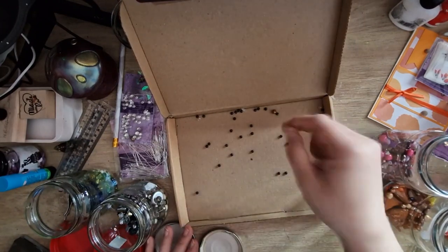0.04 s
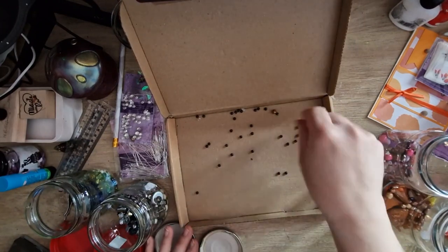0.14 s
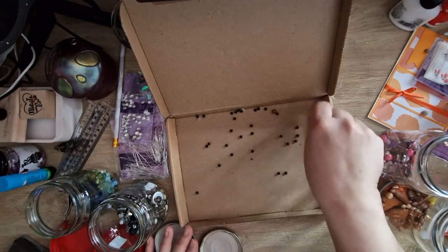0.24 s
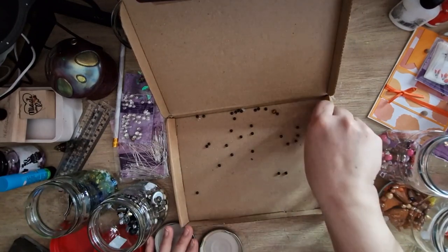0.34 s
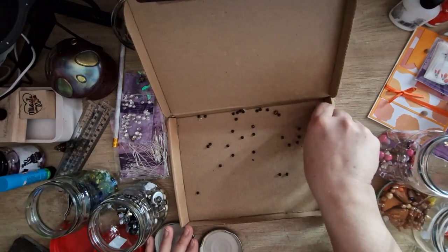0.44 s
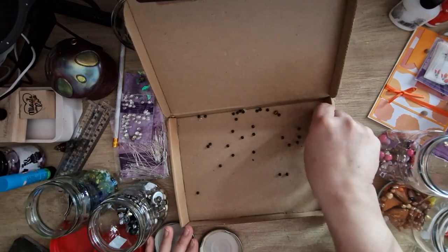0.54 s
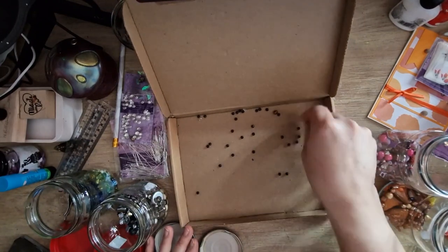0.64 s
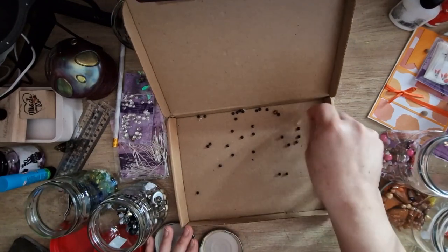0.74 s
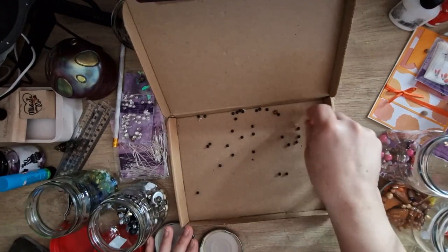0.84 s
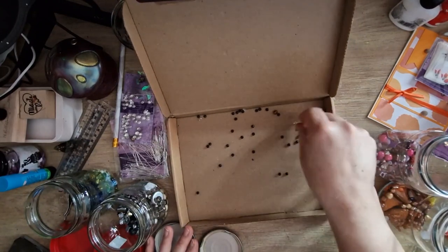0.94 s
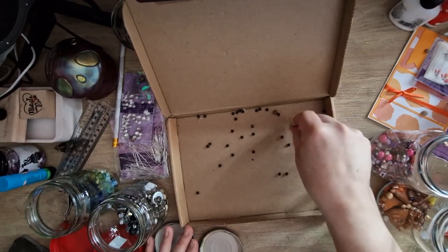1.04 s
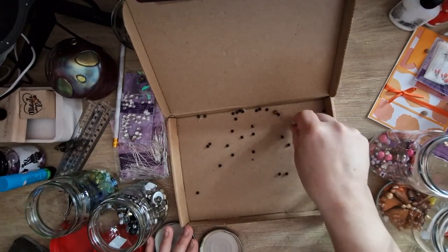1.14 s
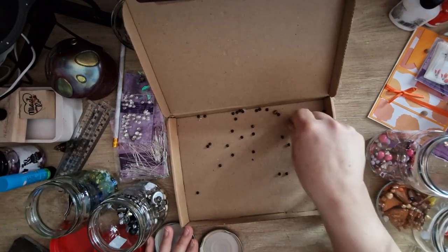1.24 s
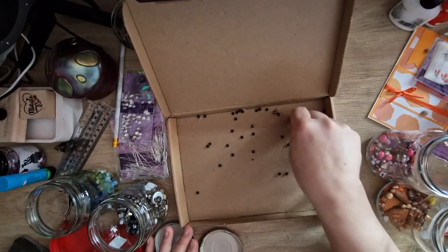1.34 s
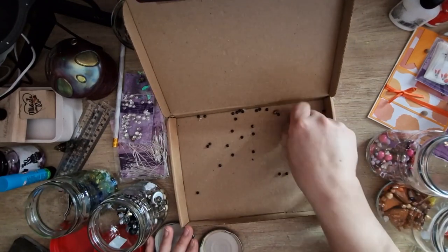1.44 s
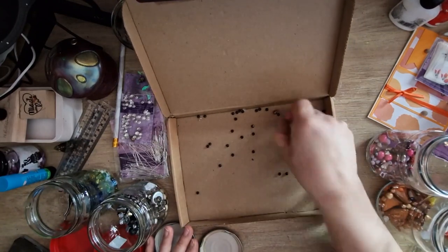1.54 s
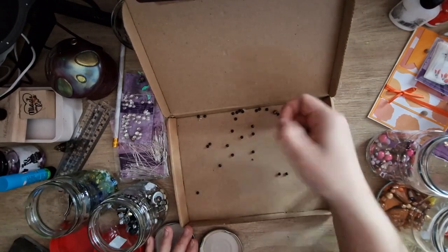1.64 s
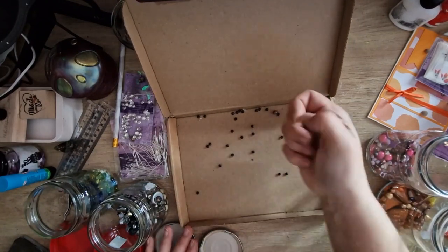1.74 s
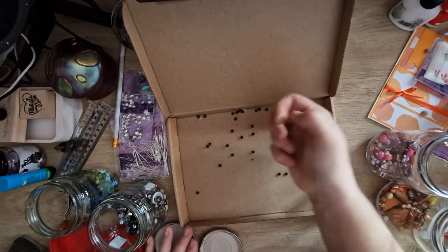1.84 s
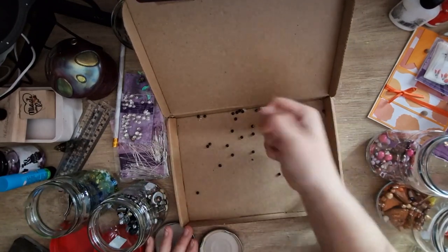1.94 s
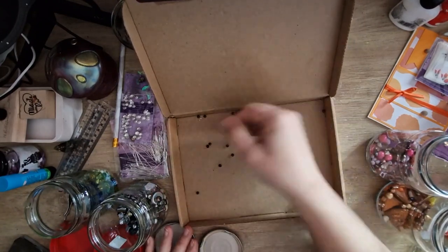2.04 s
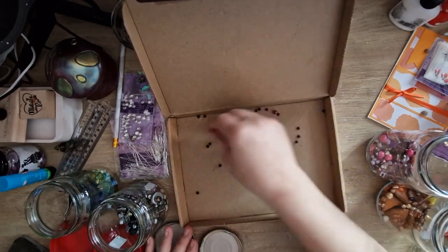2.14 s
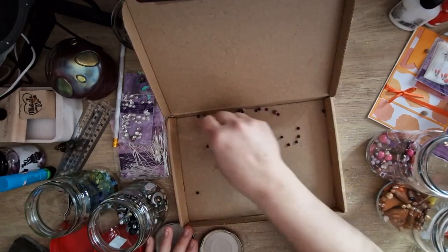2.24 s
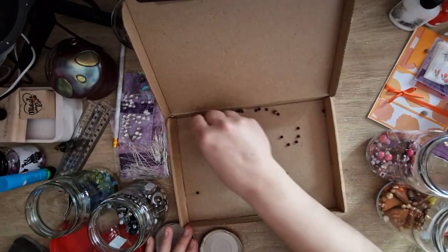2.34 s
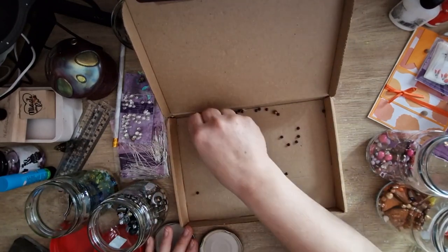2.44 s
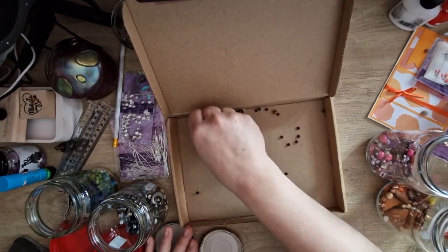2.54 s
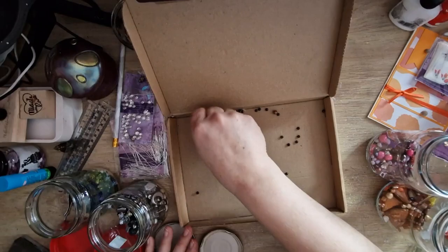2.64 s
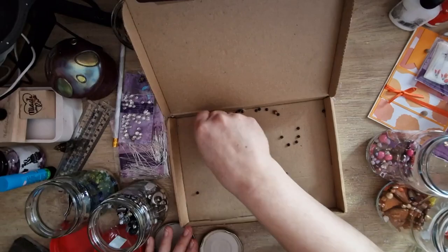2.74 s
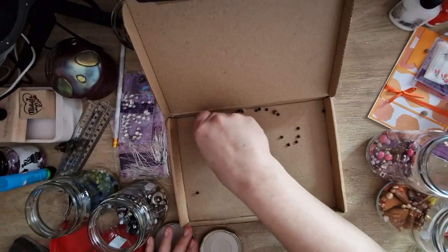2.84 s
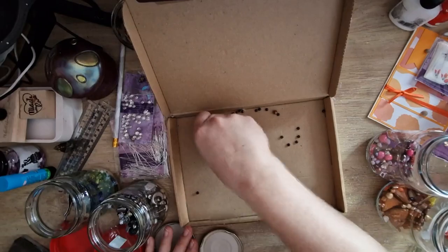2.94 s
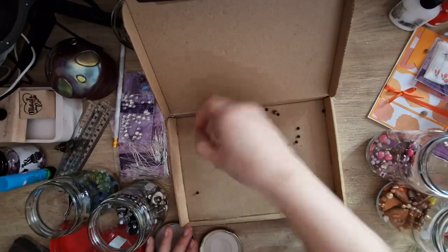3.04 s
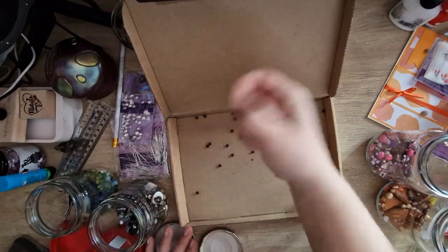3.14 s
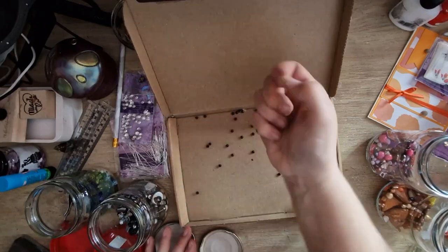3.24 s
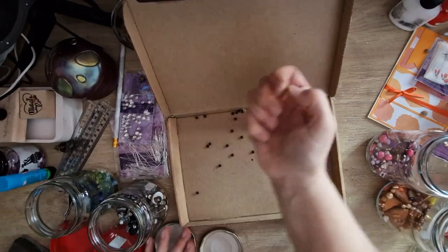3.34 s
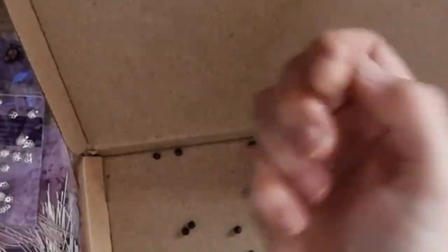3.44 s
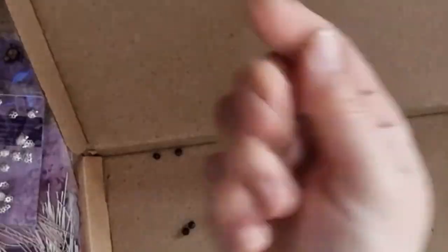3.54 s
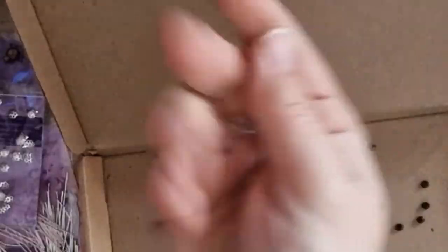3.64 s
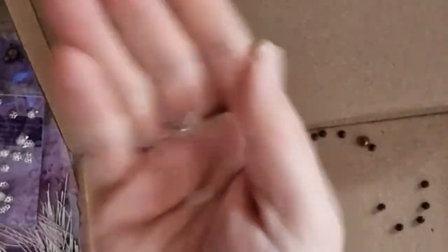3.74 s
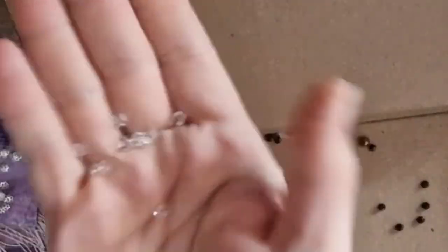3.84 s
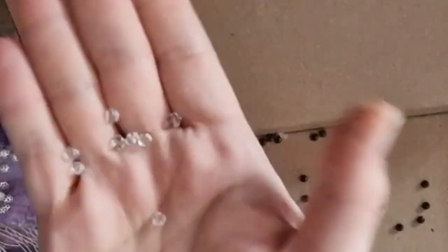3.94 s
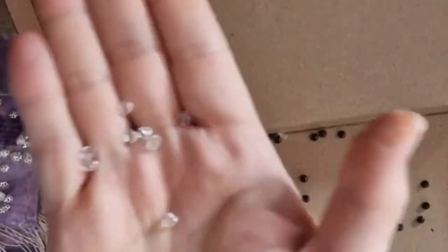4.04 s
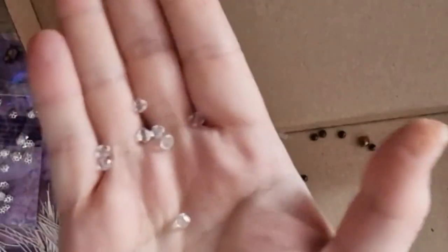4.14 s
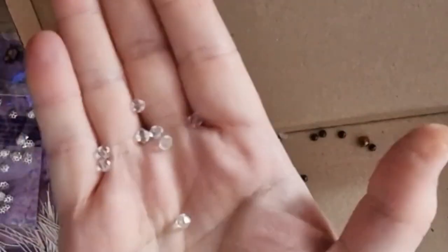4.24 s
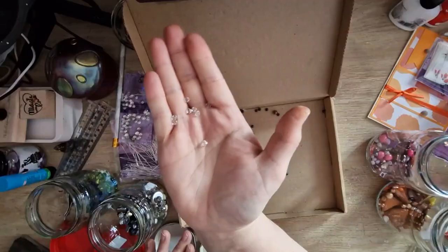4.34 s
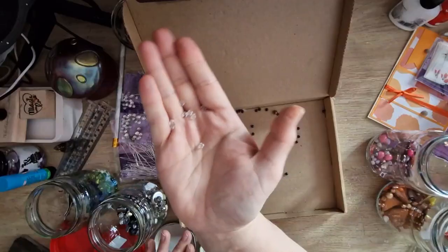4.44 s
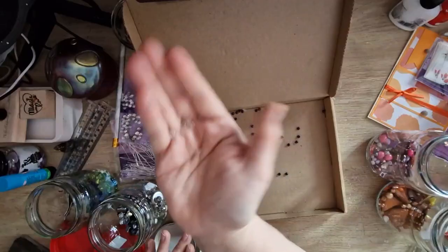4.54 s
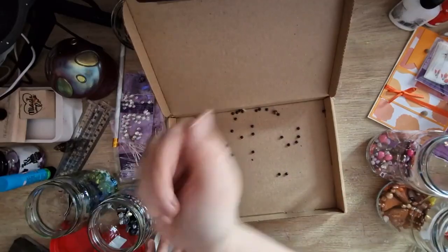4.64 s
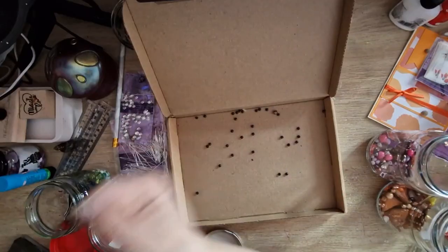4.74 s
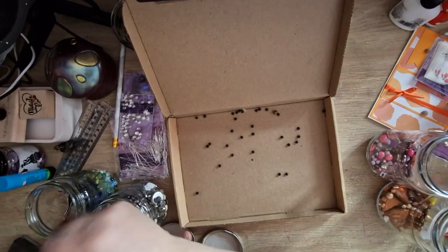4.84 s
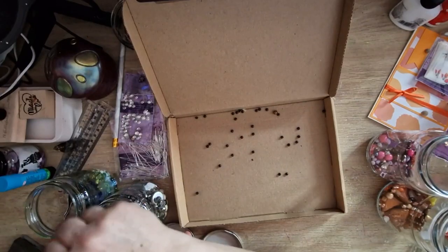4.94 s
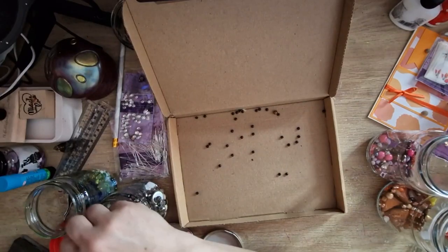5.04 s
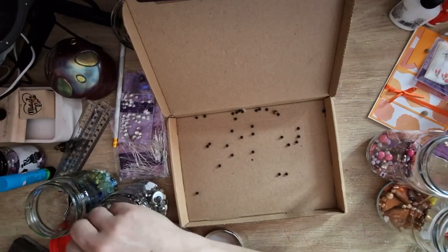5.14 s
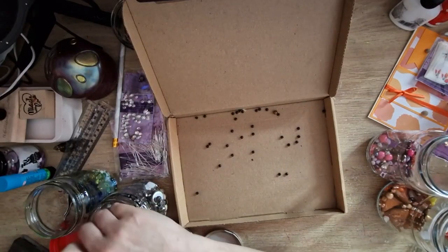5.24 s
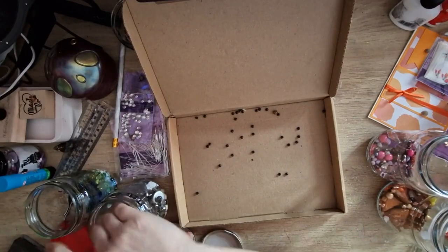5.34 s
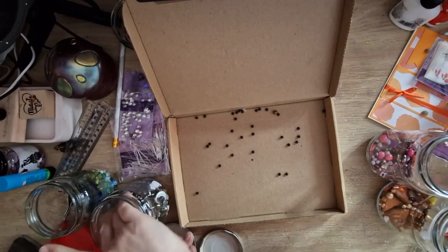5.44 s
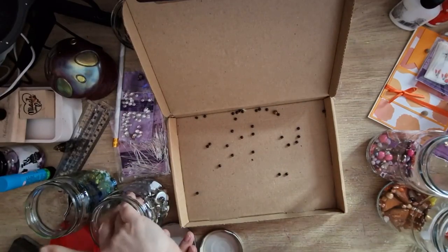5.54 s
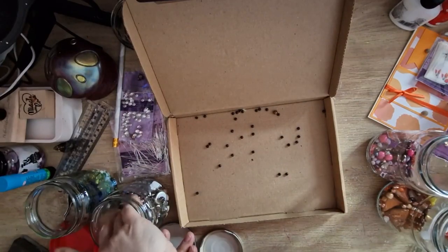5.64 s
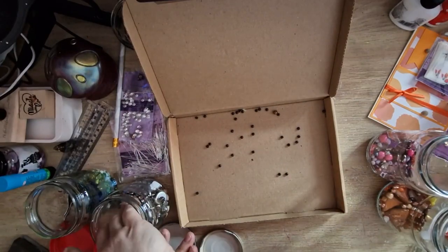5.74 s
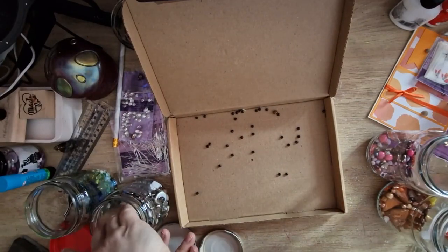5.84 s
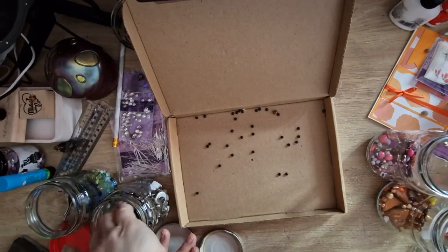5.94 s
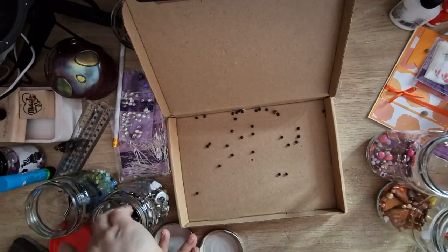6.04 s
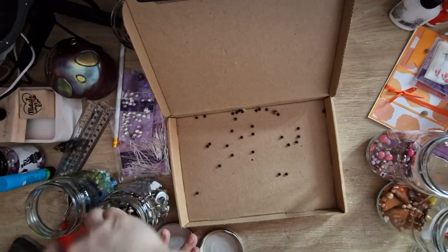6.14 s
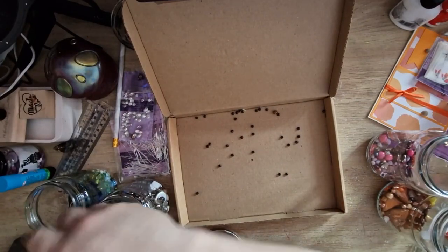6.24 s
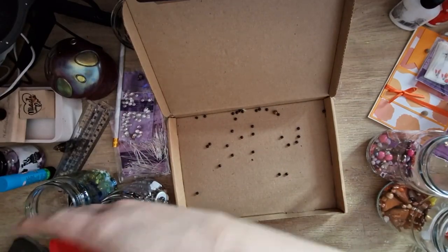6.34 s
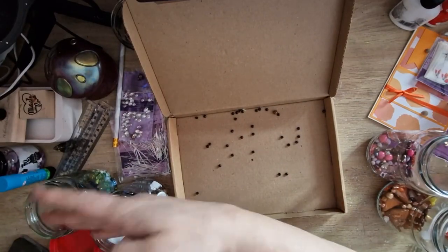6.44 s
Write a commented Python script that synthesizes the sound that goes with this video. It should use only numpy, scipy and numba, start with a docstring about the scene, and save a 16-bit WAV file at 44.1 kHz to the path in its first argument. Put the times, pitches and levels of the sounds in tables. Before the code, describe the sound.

Fingertips scrape and pick at a cardboard box with dry scuffs and cracks, then small glass beads clink and rattle into a glass jar.

```python
"""Over mains hum and air noise in a quiet room, fingers scuff a cardboard box: rough grains of noise excite its panel.
Short cracks and soft knocks mark the catches of nails and beads and the touch of fingertips.
Later a faint low tone glides up, then the hand bumps a glass jar and its air booms as a damped resonance.
Glass beads then drop in: each blow excites the damped modes of the jar, with clicks, jostling and skitters,
while two more strokes rub the board. One close microphone hears it all."""
import sys
import numpy as np
from scipy import signal
from scipy.fft import rfft, irfft
from scipy.io import wavfile
from scipy.ndimage import uniform_filter1d
from numba import njit

SR = 44100
rng = np.random.default_rng(int(sys.argv[2]) if len(sys.argv) > 2 else 0)


def int16_out(signal):
    """Quantize to a 16-bit WAV file."""
    q = np.round(np.clip(np.atleast_2d(signal).T, -1, 1) * 32767)
    wavfile.write(sys.argv[1], SR, q.astype(np.int16))


N = 286207  # length in samples

# Mains hum partials. Each row: frequency in Hz, mean level in dB rms.
HUM_PARTIALS = [(50.2, -58.5), (100.3, -49.5), (150.6, -59), (200.9, -65), (251, -59), (301, -66)]
# Spectrum of the air noise. Each row: frequency in Hz, relative density in dB.
AIR_SPECTRUM = [(15, -44), (25, -17.5), (43, -36), (70, -18), (82, -24), (102, -22), (175, -19), (256, -22),
                (326, -24), (695, -30), (962, -26), (1290, -32.5), (3620, -34), (16000, -43)]
AIR_DB = -55.5  # mean level
# Low tone rising as the hand swings over the jar. Each row: time in s, frequency in Hz, level in dB rms.
HAND_GLIDE = [(4.74, 188, -48), (4.764, 189, -48), (4.832, 200, -39), (4.9, 229, -57)]
# Bumps of the hand on the jar. Each row: start in s, level of the air boom in dB.
JAR_BUMPS = [(5.029, -27), (5.056, -13), (5.08, -14.5), (5.094, -16), (5.139, -22.5), (5.159, -30),
             (5.24, -27), (5.268, -43), (5.383, -28), (5.415, -19.5), (5.434, -31), (5.476, -16.5),
             (5.589, -45), (5.69, -39.5), (5.725, -32.5), (5.788, -36), (5.886, -28.5), (6.207, -40)]
JAR_AIR_HZ, JAR_AIR_T60_S, BUMP_S = 168, 0.27, 0.0036

# Resonances of the cardboard panel. Each row: centre in Hz, width in Hz, relative level in dB.
PANEL_MODES = [(280, 70, -7), (501, 93, 4), (707, 32, -6), (907, 34, -3)]
# Strokes of skin and nail. Each row: start in s, rise in s, hold in s, fall in s, level in dB, drift over
# the hold in dB, board boom in dB and hiss in dB (both against that level), box rumble level in dB.
STROKES = [(0.004, 0.0089, .12, .4, -58, -10, 5, -20, -54.5),
           (0.398, 0.019, 0.082, 0.065, -28.5, -14, -0.5, -3, -46),
           (0.55, 0.017, 0.019, .06, -41.5, -4.5, -1, -4, -50),
           (0.637, 0.023, .23, 0.028, -40, -3, -8, -36, -67),
           (1.267, 0.0043, 0.033, 0.053, -28, -16, -10, -3, -39.5),
           (1.336, 0.028, 0.14, 0.035, -59, 3.5, -3, 1, -42),
           (1.507, 0.031, 0.0072, 0.035, -45, -1, -3.5, 5, -44.5),
           (1.904, 0.07, 0.23, .04, -75.5, 0.5, -17, 14, -73),
           (2.245, .014, 0.15, 0.066, -44, 7.5, -6.5, 2.5, -51),
           (2.473, .01, 0.031, .015, -57, -1, -14, -5, -62),
           (2.549, 0.0059, 0.038, 0.0069, -52.5, -18, 15.5, 6, -33),
           (2.593, 0.0066, 0.029, 0.052, -34, -5.5, -4, -12, -49),
           (2.646, 0.074, 0.074, 0.082, -44.5, -0.5, 5, 9.5, -47),
           (2.858, 0.039, .1, .08, -54.5, -5, 3, 5.5, -45),
           (3.144, 0.033, 0.11, 0.16, -70, 9, 4.5, 9, -53.5),
           (4.547, 0.045, 0.17, 0.058, -61, 5.5, -4, -0.5, -53.5),
           (4.75, 0.022, .19, 0.067, -55, 1, -5.5, -13, -48.5),
           (5.019, 0.033, 0.016, 0.055, -46.5, -2, 9.5, -17, -29.5),
           (5.362, 0.055, 0.058, 0.04, -45.5, -2.5, 3.5, 2, -33.5)]
# Resonances of the hollow under the fingers, one row per stroke. Each row: three centres in Hz,
# level of the first in dB, level of the other two in dB (both against the plain sound).
HOLLOW_MODES = [(1555, 1720, 6400, 26, 12.5), (2680, 577, 885, 11.5, 11), (2780, 5600, 7800, 6, -5),
                (1130, 2450, 5580, 10, 3), (4400, 2740, 5500, -3.5, -10), (2770, 5500, 7000, 3, -4),
                (2720, 5900, 7600, 1, -8), (2340, 6600, 3900, 4, 6), (2100, 4520, 7350, 11.5, 1),
                (2160, 4600, 6300, 14.5, -1), (900, 1400, 4500, 4, -7), (2580, 1600, 3000, -7, -10),
                (2690, 5300, 6500, -0.5, -29), (4330, 1670, 5800, -10, -10), (2500, 3630, 5900, 2, 3.5),
                (1420, 2300, 6700, 12, 2), (1490, 2020, 6400, 14, 2), (1850, 2960, 5800, 12, 4),
                (1600, 1700, 7100, -1, 7)]
SWELL_DB, RUMBLE_LAG_S = 18.5, 0.017  # depth of each stroke's rise and fall; the box answers late
SOFT_TOP_HZ = 9420
# Nails and beads catching on the board. Each row: start in s, crack peak in dB before the hollow
# and soft surface colour it, centre in Hz.
CATCHES = [(0.6315, -25.5, 2500), (0.6762, -20, 2240), (0.6875, -22, 2390), (0.696, -22, 2510),
           (0.7106, -11.5, 2380), (0.7314, -10.5, 2470), (0.7505, -16.5, 2400), (0.758, -12, 2420),
           (0.7673, -16.5, 2450), (0.778, -23, 2510), (0.8148, -18.5, 5200), (0.835, -25, 1860),
           (0.845, -18, 1830), (0.8603, -16, 2340), (0.88, -19.5, 2360), (0.982, -38, 2360),
           (1.0683, -37, 2540), (1.0782, -34, 2100), (1.161, -39, 1480), (1.2565, -19.5, 1910),
           (1.2658, -4.5, 4560), (1.2717, -1, 4140), (1.68, -33.5, 4020), (1.9444, -41, 6990),
           (2.3963, -28, 2050), (2.453, -30, 2000), (2.592, -3.5, 2760), (2.928, -29, 4270),
           (3.004, -30, 1630), (3.27, -25.5, 2520), (3.285, -29, 3560), (3.297, -31, 5770),
           (4.7152, -29.5, 2430)]
CATCH_DECAY_S, CATCH_PUSH_DB = 0.0033, -26.5  # push into the board against the crack, before the push gain
# Fingertips knocking. Each row: start in s, push into the board in dB before the push gain,
# deep thud of the box on the table in dB.
FINGER_KNOCKS = [(0.468, -35, -33), (0.524, -36, -27.5), (0.981, -38, -55), (1.293, -15, -40),
                 (1.314, -30, -42), (1.449, -40, -35), (1.499, -36, -34), (2.451, -20, -35.5),
                 (2.553, -43, -31), (2.609, -32, -36), (2.927, -29.5, -34), (2.995, -36, -37),
                 (3.27, -26, -50), (3.29, -45, -36.5)]
THUD_HZ, THUD_T60_S, THUD_S = 85, 0.14, 0.005

# Jar modes in four groups: main ring, wall tone, high ring, base knock.
# Each row: frequency in Hz, relative level in dB, t60 in s before the pile's damping.
JAR_MODES = [
    [(5730, -46, .04), (5750, -11, 0.022), (5860, -9.5, 0.05), (6010, -3.5, 0.027), (6420, -8, 0.041),
     (6610, -4.5, 0.015), (7000, -8.5, 0.047), (7300, -9, 0.029), (7410, -15, .05), (7740, -16, 0.033),
     (7860, -18, 0.043), (4590, -27, 0.045)],
    [(2870, 0.5, 0.078), (3240, -6, 0.018)],
    [(8750, -3, 0.081), (9010, 4.5, 0.066), (8980, -5.5, 0.051), (11100, -43, 0.026), (13000, -23, .03),
     (13500, -0.5, 0.076), (13560, -15, 0.05), (13300, -16, 0.033), (15000, -14, .04), (16000, -26, 0.037)],
    [(599, -1, 0.089), (280, -0.5, 0.042), (833, -3.5, 0.046), (1426, -12.5, 0.045), (1837, -1.5, 0.044)],
]
# Beads striking the jar. Each row: start in s, strike level in dB, wall tone in dB and base knock in dB
# (both against the main ring).
BEAD_STRIKES = [(5.1343, -6, -15.5, -14), (5.1453, -6, -16.5, -40), (5.1527, -31, -18, -17),
                (5.1715, -6.5, -21, -16), (5.1995, -6, -19, -30), (5.2076, -2, -14.5, -18.5),
                (5.228, -42, -26, -6), (5.2375, -14, -13, -4.5), (5.2546, -5, -14, -27),
                (5.264, -5.5, -17, -24), (5.2858, -22, -22, -16), (5.2927, -26, -6, -3.5),
                (5.3178, -14, -20, -31), (5.3386, -4.5, -37, -28), (5.3401, -16.5, -8, -32),
                (5.3485, -15, -6, -7.5), (5.3526, -12, -17, -21), (5.359, -12.5, -20, -28),
                (5.3661, -15.5, -20, -20), (5.3704, -29, -3, -19), (5.3792, -21, -8.5, -16),
                (5.3983, -21.5, -15, -22), (5.412, -15, -13, -11), (5.421, -21.5, -6, -21),
                (5.4248, -23, -10, -4), (5.4334, -24, -3.5, -9), (5.452, -33, -15, -4),
                (5.463, -20, -1.5, -19), (5.476, -3.5, -10.5, -24.5), (5.509, -33, 6, -1),
                (5.5267, -27.5, -5, -10), (5.5451, -20, -11, -11), (5.5692, -26, -5, -10),
                (5.5856, -17.5, -9, -9.5), (5.5884, -29.5, -6, 1.5), (5.608, -16.5, -10.5, -40),
                (5.6675, -13, -16, -21.5), (5.6803, -17.5, -9, -17), (5.6858, -18.5, -0.5, -7),
                (5.696, -25, -21, -26), (5.71, -25, -4, -12), (5.7234, -20, -5.5, -7.5),
                (5.7342, -23.5, -11, -19), (5.7662, -16, -7, -9), (5.7714, -20.5, -8, -8),
                (5.7868, -22, -12, -17), (5.7957, -16, -13, -6.5), (5.8254, -27, -7, -9),
                (5.8556, -35, -7, -4), (5.8765, -25.5, -15, -2.5), (5.8814, -8.5, -11, -11.5),
                (5.8882, -11, -13, -15), (5.9299, -6, -12, -31), (5.9524, -38, -22, 2),
                (5.9874, -25, -14, -3.5), (6.016, -5.5, -15.5, -42), (6.0449, -31.5, -28, -2),
                (6.1033, -16.5, -11, -38), (6.1557, -30, -15, -2.5), (6.1753, -16.5, -20, -21),
                (6.2203, -30, -9, -7), (6.2361, -18, -18, -16), (6.2592, -26, -13, -12),
                (6.3624, -48, 1.5, -6)]
HIGH_DB, HIGH_SCATTER_DB = -9.5, 3  # high ring of the first bead against the main ring, and its scatter
HIGH_FADE_DB_PER_S, FREE_FADE_DB_PER_S = -3, -0.5  # the growing pile muffles the high ring and the tails

ROOM_T60_S, ROOM_DB = 0.16, -16.5
TOP_HZ = 15900  # upper limit of the recorder


def undb(db):
    """The decibel law: level to amplitude factor."""
    return 10 ** (np.asarray(db) / 20)


def unit(x):
    """Normalisation to unit root-mean-square amplitude."""
    return x / np.sqrt(np.mean(x ** 2))


@njit
def svf(x, hz, share):
    """State-variable resonance: a band-pass with a moving centre, its width a share of the centre."""
    y, low_state = np.empty(len(x)), 0.
    band_state = 0.
    for i in range(len(x)):
        g = np.tan(np.pi * hz[i] / SR)
        v = (band_state + g * (x[i] - low_state)) / (1 + g * (g + share))
        band_state = 2 * v - band_state
        low_state += 2 * g * v
        y[i] = share * v
    return y


def band(x, hz, share):
    """Resonant selection about a centre, fixed or varying in time."""
    return svf(x, hz + np.zeros(len(x)), float(share))


def strikes(s, size):
    """Impulsive excitation: an impulse of each size at each time."""
    return np.bincount((np.asarray(s) * SR).astype(int), size, N)[:N]


def ring(x, hz, t60):
    """Damped oscillation of one mode; a unit impulse rings from amplitude 1."""
    pole = np.exp((2j * np.pi * hz - np.log(1000) / t60) / SR)
    return signal.lfilter([1], [1, -pole], x).imag


def walk(rate):
    """Slow random fluctuation: random levels held 1 / rate s and slewed twice."""
    k = int(SR / rate)
    held = np.repeat(rng.standard_normal(N // k + 1), k)
    return uniform_filter1d(uniform_filter1d(held, k), k)[:N]


def room_tone():
    """Steady background: a harmonic series of hum that wavers a little over shaped random noise."""
    t = np.arange(N) / SR
    hum = sum(np.sqrt(2) * undb(db + walk(2.62)) * np.sin(2 * np.pi * (hz * t + rng.random()))
              for hz, db in HUM_PARTIALS)
    hz, db = np.transpose(AIR_SPECTRUM)
    f = np.maximum(np.fft.rfftfreq(N, 1 / SR), 1)
    density = undb(np.interp(np.log(f), np.log(hz), db))
    air = irfft(rfft(rng.standard_normal(N)) * density, N)
    return hum + undb(AIR_DB + 0.81 * walk(5.37)) * unit(air)


def hand_glide():
    """Frequency modulation: the phase of a sine is the running sum of its gliding frequency."""
    t = np.arange(N) / SR
    s, hz, db = np.transpose(HAND_GLIDE)
    edge = np.clip(np.minimum(t - s[0], s[-1] - t) / 0.014, 0, 1)
    swell = edge * undb(np.interp(t, s, db))
    return np.sqrt(2) * swell * np.sin(2 * np.pi * np.cumsum(np.interp(t, s, hz)) / SR)


def jar_air():
    """Cavity resonance: soft pushes of the palm ring the air in the jar as one damped mode."""
    s, db = np.transpose(JAR_BUMPS)
    push = np.hanning(int(BUMP_S * SR))
    drive = np.convolve(strikes(s, undb(db)), push / push.sum())[:N]
    return ring(drive, JAR_AIR_HZ, JAR_AIR_T60_S)


def board(x):
    """Modal superposition: the cardboard panel's broad low resonances add up."""
    return sum(undb(db) * band(x, hz, width / hz) for hz, width, db in PANEL_MODES)


def hollow(x, plain_db=-7, share=.1):
    """Resonance of the hollow under the fingers: each stroke's three peaks are added to the plain sound."""
    starts = [stroke[0] - .02 for stroke in STROKES]  # the hollow changes shortly before each stroke
    now = np.maximum(np.searchsorted(starts, np.arange(N) / SR) - 1, 0)
    first, second, third, first_db, other_db = np.array(HOLLOW_MODES, float)[now].T
    others = band(x, second, share) + band(x, third, share)
    peaks = undb(first_db) * band(x, first, share) + undb(other_db) * others
    return undb(plain_db) * (x + peaks)


def soft(x, leak_db=-14):
    """Low-pass action of soft skin and card: only a weaker plain leak passes far above the top."""
    return signal.sosfilt(signal.butter(3, SOFT_TOP_HZ, fs=SR, output="sos"), x) + undb(leak_db) * x


def rubs(grain_db=1.5, slip_db=2.5, rough_db=4):
    """Stick-slip friction: dense grains scrape and hiss, the board booms, the box rumbles under the hand."""
    body_gain, boom_gain, hiss_gain, rumble_gain = np.zeros((4, N))
    for start, rise, hold, fall, db, drift_db, boom_db, hiss_db, rumble_db in STROKES:
        knots = np.cumsum([0, rise, hold, fall])
        t = np.arange(int(knots[-1] * SR)) / SR
        edge = np.clip(np.minimum(t, knots[-1] - t) / 0.0014, 0, 1)
        contact = edge * undb(np.interp(t, knots, [-SWELL_DB, 0, 0, -SWELL_DB]))
        rub = contact * undb(db + drift_db * np.clip((t - rise) / hold, 0, 1))
        i, j = int(start * SR), int((start + RUMBLE_LAG_S) * SR)
        body_gain[i:i + len(t)] += rub
        boom_gain[i:i + len(t)] += rub * undb(boom_db)
        hiss_gain[i:i + len(t)] += rub * undb(hiss_db)
        rumble_gain[j:j + len(t)] += contact * undb(rumble_db)
    # exponential random levels make some grains stand out
    scrape_grains, boom_grains, rumble_grains = [
        rng.standard_normal(N) * undb(grain_db * rng.exponential(size=N) + slip_db * walk(150))
        for _ in range(3)]
    scrape = body_gain * unit(band(scrape_grains, 1930, 1.9))
    scrape += hiss_gain * unit(band(scrape_grains, 5050, 1.24))
    rough = rumble_grains * undb(rough_db * walk(40))
    rumble = unit(band(band(rough, 178, 1.46), 150, 1.46))
    return scrape, boom_gain * unit(board(boom_grains)) + rumble_gain * rumble


def catches_and_knocks(rise_s=0.00093, share=1.2, push_db=3):
    """Impact excitation: catches crack as short noise bursts; catches and knocks push the board; knocks thud."""
    cracks, t = np.zeros(N), np.arange(1200) / SR
    noise = rng.standard_normal((len(CATCHES), len(t)))
    envelope = np.exp(-t / CATCH_DECAY_S) * (1 - np.exp(-t / rise_s))
    for (s, db, hz), n in zip(CATCHES, noise):
        crack = band(n * envelope, hz, share)
        i = int(s * SR)
        cracks[i:i + len(t)] += undb(db) * crack / np.abs(crack).max()
    s, db, _ = np.transpose(CATCHES)
    knock_s, knock_db, thud_db = np.transpose(FINGER_KNOCKS)
    blows = strikes(s, undb(db + CATCH_PUSH_DB)) + strikes(knock_s, undb(knock_db))
    push = np.convolve(blows, np.hanning(24))[:N]
    press = np.hanning(int(THUD_S * SR))
    thud_drive = np.convolve(strikes(knock_s, undb(thud_db)), press / press.sum())[:N]
    return cracks, undb(push_db) * board(push) + ring(thud_drive, THUD_HZ, THUD_T60_S)


def beads(scatter_db=3.0, detune=0.0058, click_db=-20, click_s=0.0028, wash_db=-36, wash_s=0.015,
          skitter_db=-24, skitter_s=.015, free_db=-14, contact_s=.0003, damp_s=.0028):
    """Modal excitation: where each bead lands sets the shares and slight detuning of the jar's damped modes."""
    out, t = np.zeros(N + 10000), np.arange(4400) / SR
    group = np.concatenate([[k] * len(modes) for k, modes in enumerate(JAR_MODES)])
    hz, mode_db, t60 = np.vstack(JAR_MODES).T
    chance = rng.standard_normal((len(BEAD_STRIKES), 3, len(hz)))
    noise = rng.standard_normal((len(BEAD_STRIKES), len(t)))
    skips = rng.random((len(BEAD_STRIKES), 2, 9))
    decay = np.exp(-np.log(1000) * t / t60[:, None])
    for (s, db, wall_db, base_db), (spot, bend, side), n, (wait, size) in zip(
            BEAD_STRIKES, chance, noise, skips):
        since_first = s - BEAD_STRIKES[0][0]
        # the scatter of the last high mode also shifts the whole high group
        high_db = HIGH_DB + HIGH_FADE_DB_PER_S * since_first + HIGH_SCATTER_DB * spot[-6]
        group_db = np.array([0, wall_db, high_db, base_db])
        # the blow's energy in each group is shared out among its modes
        power = undb(mode_db + scatter_db * spot) ** 2
        energy_share = power / np.bincount(group, power)[group]
        polarity = np.sign(side + 0.67)  # mostly positive
        gain = polarity * undb(group_db[group]) * np.sqrt(energy_share)
        modes = np.sin(2 * np.pi * np.outer(hz * (1 + detune * bend), t)) * decay
        # the contact builds up briefly; the pile of beads soaks up most of the ring at once
        free = undb(free_db + FREE_FADE_DB_PER_S * since_first)
        clink = (gain @ modes) * (1 - np.exp(-t / contact_s)) * (np.exp(-t / damp_s) + free)
        # the contact clicks, and the beads already lying there jostle
        click = undb(click_db) * n * np.exp(-t / click_s)
        jostle = undb(wash_db) * band(n, 3900, 0.46) * np.exp(-t / wash_s)
        # nine weaker repeats at random delays make the skitter
        delays = (-skitter_s * np.log(wait) * SR).astype(int) % 5000
        bounce = np.bincount(np.r_[0, delays], np.r_[1, undb(skitter_db - 14 * size)])
        clink = signal.fftconvolve(clink + click + jostle, bounce)
        i = int(s * SR)
        out[i:i + len(clink)] += undb(db) * clink
    return out[:N]


def room(x, dull_hz=9000):
    """Diffuse reverberation: convolution with decaying noise, a little duller, that starts 3 ms late."""
    t = np.arange(int(.4 * SR)) / SR
    tail = rng.standard_normal(len(t)) * np.exp(-np.log(1000) * t / ROOM_T60_S) * (t > .003)
    tail = signal.sosfilt(signal.butter(1, dull_hz, fs=SR, output="sos"), tail)
    return undb(ROOM_DB) * signal.fftconvolve(x, tail / np.sqrt(np.sum(tail ** 2)))[:N]


def scene():
    """Superposition of all sources; only the impacts on board and jar excite the room."""
    scrape, rumble = rubs()
    cracks, pushes = catches_and_knocks()
    hits = soft(hollow(cracks)) + pushes + beads()
    strokes = soft(hollow(scrape), leak_db=-7) + rumble
    mix = hits + room(hits) + strokes + jar_air() + hand_glide() + room_tone()
    return mix[None]


def record(dry):
    """Band limiting and saturation: the microphone drops deep bass; the recorder rounds peaks and cuts the top."""
    heard = signal.sosfilt(signal.butter(2, 45, "high", fs=SR, output="sos"), dry)
    rounded = np.tanh(1.13 * heard) / 1.16
    return signal.sosfilt(signal.ellip(8, .2, 60, TOP_HZ, fs=SR, output="sos"), rounded)


dry = scene()
out = record(dry)
int16_out(out)
```